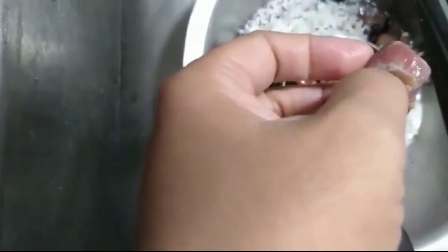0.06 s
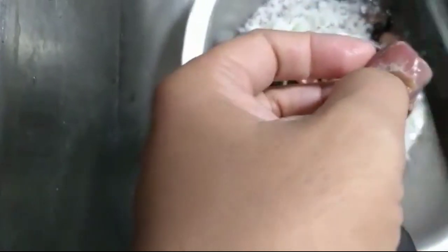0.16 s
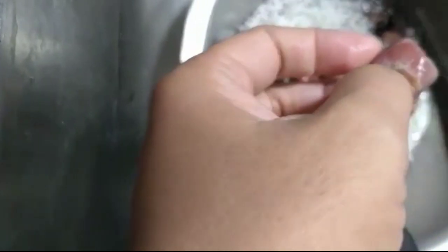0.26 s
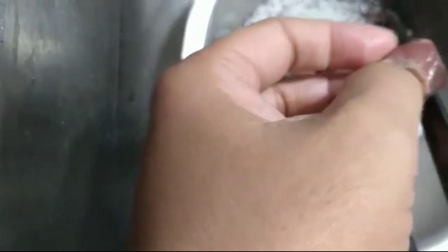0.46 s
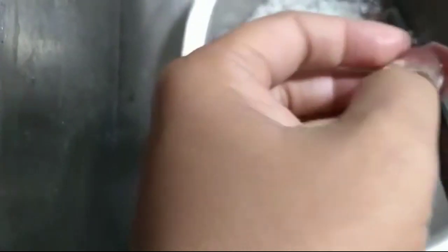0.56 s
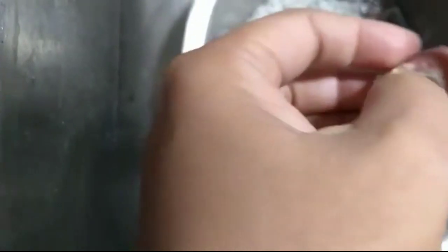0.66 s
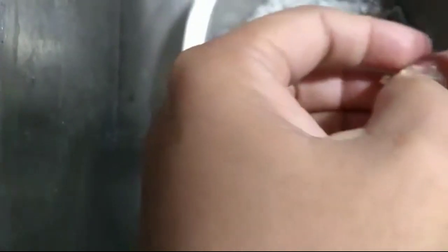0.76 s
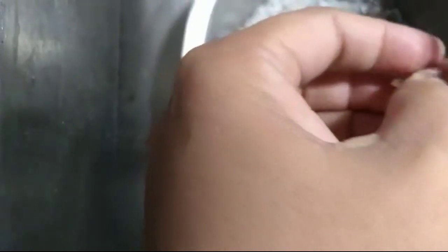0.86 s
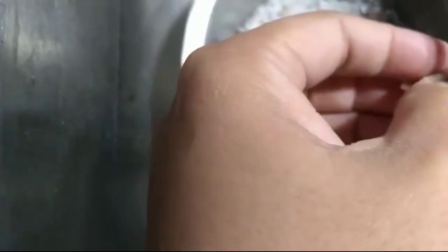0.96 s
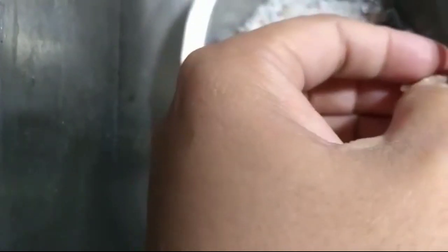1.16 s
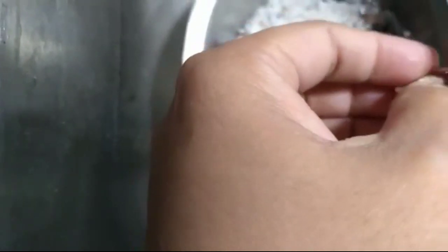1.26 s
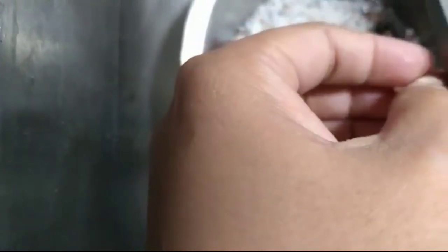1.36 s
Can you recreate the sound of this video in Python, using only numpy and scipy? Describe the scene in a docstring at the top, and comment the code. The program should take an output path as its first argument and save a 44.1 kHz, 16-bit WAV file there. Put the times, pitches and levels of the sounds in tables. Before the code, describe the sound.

Scissors snip soft meat once over a bowl in a steel sink, close to the microphone: hissy metal scrape into a sharp woody clack, short ring, soft fading knocks, then near silence with faint low handling rumble.

```python
"""One kitchen-scissors snip

Scissors cut through liver, close over a bowl in a steel sink. Random catches of edge on edge make a short
bright rasp; then the handles clap shut with dry cracks and a thump of low modes that rings in sink and room.
Wet grains and a thin ping follow, with soft swelling bumps after the clap and noisy rubs from just before
it onwards. Grip rumble, a low wavering hum of sines and a faint coloured-noise hiss lie underneath."""
import sys
import numpy as np
from scipy import signal
from scipy.fft import rfft, irfft
from scipy.io import wavfile
from scipy.ndimage import map_coordinates

SR = 44100
rng = np.random.default_rng(int(sys.argv[2]) if len(sys.argv) > 2 else 0)


def dump_mix(stems):
    """Bounce the given channels to the path in sys.argv[1] as a 16-bit WAV at rate SR."""
    frames = np.atleast_2d(stems).T  # one column per channel
    limited = np.clip(frames, -1, 1)  # hard clip at full scale
    pcm = np.round(limited * 32767).astype(np.int16)
    wavfile.write(sys.argv[1], SR, pcm)


N = 61739
TIME = np.arange(N) / SR

# In every table, left-right is how much louder the left side is [dB]; spectrum levels are relative.
# Room tone and hiss: (frequency [Hz], level per Hz [dB])
AIR_SPECTRUM = [(25, -11), (120, -1), (450, -6), (1000, -18.5), (2500, -22), (4500, -28.5), (7500, -28),
                (9800, -17), (12000, -33)]
# Partials of the hum: (frequency [Hz], level before the swell [dB])
HUM_PARTIALS = [(60, -72), (120, -63), (240, -70.5)]
# Slow swell of the hum: (time [s], gain [dB])
HUM_SWELL = [(.55, -8.5), (.76, 0.5), (.92, -5.5), (1.02, 2), (1.22, 8), (1.4, 1)]
# Rumble of the grip: (time [s], level [dB])
GRIP_LEVEL = [(0, -67), (.5, -66), (.6, -93), (.68, -62.5), (.88, -65.5), (1.03, -55.5), (1.11, -63),
              (1.25, -58), (1.4, -63)]
# Colour of the grip rumble: (frequency [Hz], level per Hz [dB])
RUMBLE_SPECTRUM = [(25, -17.5), (60, 5.5), (120, -1.5), (200, 3.5), (300, 0.5), (450, -21), (900, -28),
                   (2000, -36)]
# Reflections of sink and walls: (frequency [Hz], relative level [dB], T60 [s])
ROOM_BANDS = [(99.9, -16, .25), (299.6, -17.5, 0.11), (647, -4.5, 0.27), (1370, -5.5, 0.23),
              (2800, -12, 0.2), (5500, -7, 0.15), (9500, -9, 0.27), (12500, -25.5, .26)]
# The hand moves across: (time [s], left-right [dB])
HAND_PAN = [(.45, -7.5), (.66, 6), (1.25, 14)]
# The left side lags at first, then both sides nearly coincide: (time [s], lag of the left side [s])
LEFT_LAG = [(.5, .0005), (.66, 0.000023)]
# Faint rubs of meat, fingers and blades:
# (centre time [s], level [dB], Gaussian spread [s], centre [Hz], width [octaves], left-right [dB])
RUBS = [(0.278, -34, 0.0074, 279.8, 0.73, 5.5), (0.362, -62.5, 0.036, 6380, 0.38, 4),
        (0.475, -71.5, 0.05, 1876, 0.8, 3.5), (0.496, -67, 0.017, 2760, 0.032, 4),
        (0.914, -67, .01, 629.5, 0.084, 0.5), (1.015, -75.5, 0.03, 5350, 1.03, 7.5),
        (1.26, -74.5, 0.019, 1490, 1.02, 7.5)]
# Soft bumps of fingers and handles: (time [s], level [dB], pitch [Hz], T60 [s], build-up [s])
BUMPS = [(0.31, -19, 161, 0.06, 0.0017), (0.345, -26, 186, 0.018, 0.011), (.364, -36, 217, 0.06, 0.0078),
         (.392, -35.5, 198.7, 0.034, 0.021), (0.449, -39.5, 186.7, 0.038, 0.012),
         (0.667, -45.5, 161.5, 0.045, 0.0028), (0.684, -48.5, 276.6, 0.06, 0.007),
         (0.884, -55.5, 55, .15, 0.014), (1.007, -48.5, 73.7, 0.11, 0.01),
         (1.043, -45.5, 228, 0.041, 0.0032), (1.254, -42, 126.7, 0.066, 0.0054)]
# Colour of the wet grains: (frequency [Hz], level per Hz [dB])
SQUELCH_SPECTRUM = [(400, -2.5), (650, 5.5), (1100, -4), (2600, 0), (4300, -15.5), (11000, -22)]
# What the clap rings in handles, hand and sink:
# (frequency [Hz], relative level [dB], T60 [s], build-up [s], left-right [dB])
BODY_MODES = [(87.4, -15.5, 0.18, 0.012, -1.5), (128, -17, .12, .006, -3), (160.8, -15.5, .15, 0.014, 2.5),
              (206, -15.5, .17, .012, -6), (298, 1, .06, .001, -3), (379.3, -16, 0.071, 0.0011, -3.5),
              (515.8, -16, 0.13, .002, 0.5), (702, -19, 0.099, 0.0012, 0.5)]
# The handles meet, then fainter cracks follow, likely thrown back by the sink wall:
# (time [s], level [dB], left-right [dB])
CRACKS = [(0.282, -15, -5), (0.2856, -26, 6), (0.289, -26, 4)]
# Colour of the cracks: (frequency [Hz], level per Hz [dB])
CRACK_SPECTRUM = [(400, 0.5), (1500, 1), (2300, 3.5), (3200, 0.5), (4200, -10), (6000, -17.5),
                  (8000, -15.5), (9800, -3.5), (12500, -27)]
# Ring of the steel blades: (frequency [Hz], relative level [dB], T60 [s])
BLADE_MODES = [(8635, -8, .17), (9321, -7, .2), (9678, -8, .2), (11533, -8, .18)]
# Colour of the rasp: (frequency [Hz], level per Hz [dB])
RASP_SPECTRUM = [(1100, -38.5), (1600, -18), (2100, -15.5), (2550, -8.5), (2950, -15.5), (3350, -7),
                 (4250, -33.5), (4900, -9.5), (6000, -19.5), (7100, -8), (10000, 0), (12600, 2.5),
                 (13800, -28.5)]

# Underneath
ALIKE_HZ = 704   # below this both sides hear much the same
AIR_DB, AIR_PAN_DB = -67.5, 2.1
HUM_WAVER_PER_S, HUM_WAVER_TURNS = 28, 0.11   # random phase drift, in turns
GRIP_TREMBLE_PER_S, GRIP_TREMBLE_DB = 35, -0.5
LOW_PAN_SHARE = 0.17   # how far rumble and hum move with the hand
ROOM_DELAY_S, ROOM_BUILD_S = 0.0013, 0.0083
CUTOFF_HZ = 13100

# Hands, bowl and meat
RUB_GRAIN_PER_S, RUB_GRAIN_DB = 510, 2.5
PING_S, PING_DB, PING_RISE_S = 0.291, -22, 0.0092
PING_HZ, PING_T60_S, PING_PAN_DB = 905, 0.14, -3
SQUELCH_DB, SQUELCH_T60_S, SQUELCH_PER_S, SQUELCH_SPREAD_DB = -38, 0.2, 700, 9

# The handles meet
SHUT_S = 0.281
CONTACT_S = 0.00085   # a longer contact makes a duller thump
THUMP_DB, THUMP_LOW_HZ = -5.5, 50
CRACK_RISE_S, CRACK_T60_S, CRUNCH_PER_S = 0.001, 0.02, 4300
SNAP_HZ, SNAP_T60_S, SNAP_DB, SNAP_PAN_DB = 3003, 0.017, -18.5, -10.5
BLADES_DB = -42.5   # added to the relative levels of the blade modes

# The blades slide, then drag on faintly until they are shut
SHEAR_S, SHEAR_RISE_S, SHEAR_HOLD_S, SHEAR_T60_S = 0.2281, 0.0105, 0.008, 0.055
SHEAR_DB, DRAG_DB = -20.5, -17.5   # the drag is relative to the full slide
SHEAR_PAN_DB, SHEAR_TRAVEL_S = -12.5, 0.016   # the crossing point runs along the blades to the centre
CATCHES_PER_S, CATCH_SPREAD_DB = 9100, 1.5
RASP_TOP_HZ, RASP_TOP_SHADE_DB = 11500, -7.5   # the hand shades the highest treble on the left
GRIT_TOP_HZ, GRIT_LATE_S = 4300, 0.011   # the lower grit sets in as the blades bite
SHEAR_RING_DB = -14.5   # ring of the blades relative to the rasp


def from_db(db):
    """Decibels to gain."""
    return 10 ** (np.asarray(db) / 20)


def rms_one(x):
    """Scale to unit rms."""
    return x / np.sqrt(np.mean(x ** 2) + 1e-20)


def pan(db):
    """Left and right gains for a left-right difference in dB."""
    return from_db(np.array([[1], [-1]]) * db / 2)


def at_hz(points, hz, axis=1):
    """Read a column of a table on a log-frequency axis."""
    table = np.array(points)
    return np.interp(np.log(hz + 1), np.log(table[:, 0]), table[:, axis])


def in_time(points):
    """A control curve at every sample."""
    return np.interp(TIME, *np.transpose(points))


def onset(start, rise):
    """A straight rise from 0 to 1."""
    return np.clip((TIME - start) / rise, 0, 1)


def fade(start, t60):
    """Zero until the start, then an exponential decay from 1."""
    return (TIME >= start) * from_db(-60 * np.maximum(TIME - start, 0) / t60)


def ring(start, hz, t60):
    """A struck mode: a sine that decays exponentially."""
    return fade(start, t60) * np.sin(2 * np.pi * hz * (TIME - start))


def flutter(per_s):
    """Smooth chance with a spread of about 1, changing so many times a second."""
    return np.interp(TIME * per_s, np.arange(N), rng.standard_normal(N))


def colour(x, spectrum):
    """Give a steady signal a spectrum; rms 1."""
    gains = from_db(at_hz(spectrum, np.fft.rfftfreq(N, 1 / SR)))
    return rms_one(irfft(rfft(x) * gains, N))


def stereo_noise():
    """White noise, shared by both sides in the bass and unrelated in the treble."""
    mid, side = rfft(rng.standard_normal((2, N)))
    alike = 1 / (1 + (np.fft.rfftfreq(N, 1 / SR) / ALIKE_HZ) ** 2)
    shared = np.sqrt(1 + alike) * mid
    opposed = np.sqrt(1 - alike) * side * [[1], [-1]]
    return irfft(shared + opposed, N)


def catches(per_s, spread_db):
    """Tiny random clicks of uneven size and either sign, unrelated on the two sides."""
    sizes = from_db(spread_db * np.minimum(rng.exponential(1, (2, N)), 4))
    signs = rng.choice([-1, 1], (2, N))
    return sizes * signs * (rng.random((2, N)) < per_s / SR)


def room_tone():
    """Steady coloured noise: the air of the room and a hiss."""
    return from_db(AIR_DB) * pan(AIR_PAN_DB) * colour(stereo_noise(), AIR_SPECTRUM)


def hum():
    """Low sine partials whose phases drift separately, swelling together."""
    partials = 0
    for hz, db in HUM_PARTIALS:
        turns = hz * TIME + rng.random() + HUM_WAVER_TURNS * flutter(HUM_WAVER_PER_S)
        partials = partials + from_db(db) * np.sqrt(2) * np.sin(2 * np.pi * turns)
    return pan(LOW_PAN_SHARE * in_time(HAND_PAN)) * from_db(in_time(HUM_SWELL)) * partials


def grip_rumble():
    """Uneven low noise from the trembling grip."""
    level_db = in_time(GRIP_LEVEL) + GRIP_TREMBLE_DB * flutter(GRIP_TREMBLE_PER_S)
    rumble = from_db(level_db) * colour(stereo_noise(), RUMBLE_SPECTRUM)
    return pan(LOW_PAN_SHARE * in_time(HAND_PAN)) * rumble


def kitchen(x):
    """Dense reflections from sink and walls, dying away band by band."""
    white, hz = rfft(stereo_noise()), np.fft.rfftfreq(N, 1 / SR)
    edges = np.geomspace(50, 16000, 15)
    build = onset(ROOM_DELAY_S, ROOM_BUILD_S)
    response = 0
    for low, high in zip(edges, edges[1:]):
        centre = np.sqrt(low * high)
        tail = build * fade(0, at_hz(ROOM_BANDS, centre, axis=2))
        band = irfft(white * ((hz >= low) & (hz < high)), N)
        response = response + from_db(at_hz(ROOM_BANDS, centre)) * band * tail / np.linalg.norm(tail)
    response = response * (TIME >= ROOM_DELAY_S)
    return signal.fftconvolve([x.mean(axis=0)], response, axes=1)[:, :N]


def rubs():
    """Faint swells of friction: grainy band-passed noise."""
    out = 0
    for s, db, spread_s, hz, octaves, side_db in RUBS:
        edges = np.clip(hz * 2 ** (np.array([-0.5, 0.5]) * octaves), 20, SR / 2 - 20)
        band = signal.butter(1, edges, "band", fs=SR, output="sos")
        friction = signal.sosfilt(band, stereo_noise())
        grain = from_db(RUB_GRAIN_DB * flutter(RUB_GRAIN_PER_S))
        swell = np.exp(-0.5 * ((TIME - s) / spread_s) ** 2)
        out = out + from_db(db) * pan(side_db) * swell * rms_one(grain * friction)
    return out


def bumps():
    """Dull knocks of the hand on the handles: each swells as the flesh presses, then dies quickly."""
    knocks = 0
    for s, db, hz, t60, rise in BUMPS:
        press = np.where(TIME < s + rise, onset(s, rise), fade(s + rise, t60))
        knocks = knocks + from_db(db) * press * np.sin(2 * np.pi * hz * (TIME - s))
    return pan(in_time(HAND_PAN)) * knocks


def ping():
    """Something thin and hard, likely the bowl, gives one short, dry note just after the clap."""
    note = onset(PING_S, PING_RISE_S) * ring(PING_S, PING_HZ, PING_T60_S)
    return from_db(PING_DB) * pan(PING_PAN_DB) * note


def squelch():
    """The cut meat parts in uneven wet grains that die away."""
    grains = colour(catches(SQUELCH_PER_S, SQUELCH_SPREAD_DB), SQUELCH_SPECTRUM)
    return from_db(SQUELCH_DB) * fade(SHUT_S, SQUELCH_T60_S) * grains


def thump():
    """The blow of the handles, softened by the grip, rings the low modes."""
    modes = 0
    for hz, db, t60, rise, side_db in BODY_MODES:
        modes = modes + from_db(db) * pan(side_db) * ring(SHUT_S, hz, t60) * onset(SHUT_S, rise)
    push = TIME * np.exp(-2 * np.pi * TIME / CONTACT_S)   # a soft contact pulse
    softened = signal.fftconvolve(modes, [push / push.sum()], axes=1)[:, :N]
    blow = -from_db(THUMP_DB) * softened   # polarity flipped
    return signal.sosfilt(signal.butter(2, THUMP_LOW_HZ, "high", fs=SR, output="sos"), blow)


def blade_ring(start):
    """All modes of the steel blades, at slightly different random levels on each side."""
    modes = 0
    for hz, db, t60 in BLADE_MODES:
        modes = modes + from_db(db + rng.normal(0, 1, (2, 1))) * ring(start, hz, t60)
    return modes


def clap():
    """The handles meet in a dry, grainy crack with fainter ones after it, a brief hard snap and blade ring."""
    bursts = 0
    for s, db, side_db in CRACKS:
        bursts = bursts + from_db(db) * pan(side_db) * onset(s, CRACK_RISE_S) * fade(s, CRACK_T60_S)
    cracks = bursts * colour(catches(CRUNCH_PER_S, CATCH_SPREAD_DB), CRACK_SPECTRUM)
    snap = from_db(SNAP_DB) * pan(SNAP_PAN_DB) * ring(SHUT_S, SNAP_HZ, SNAP_T60_S)
    return cracks + snap + from_db(BLADES_DB) * blade_ring(SHUT_S)


def shear():
    """Edge catches on edge thousands of times a second as the blades close, and the steel rings along."""
    rise = onset(SHEAR_S, SHEAR_RISE_S) ** 2
    release_s = SHEAR_S + SHEAR_RISE_S + SHEAR_HOLD_S
    slide = np.where(TIME < release_s, rise, fade(release_s, SHEAR_T60_S))
    drag = from_db(DRAG_DB) * rise * (TIME < SHUT_S)

    left, right = catches(CATCHES_PER_S, CATCH_SPREAD_DB)
    shaded = [(hz, db + RASP_TOP_SHADE_DB * (hz > RASP_TOP_HZ)) for hz, db in RASP_SPECTRUM]
    texture = np.array([colour(left, shaded), colour(right, RASP_SPECTRUM)])
    rasp = from_db(SHEAR_DB) * np.maximum(slide, drag) * texture

    grit = signal.sosfiltfilt(signal.butter(2, GRIT_TOP_HZ, fs=SR, output="sos"), rasp)
    rasp = rasp - grit * (1 - onset(SHEAR_S, GRIT_LATE_S) ** 2)
    steel = signal.fftconvolve(rasp, blade_ring(0), axes=1)[:, :N]
    steel = rms_one(steel) * rasp.std()   # as strong as the rasp, before its own level
    side_db = SHEAR_PAN_DB * (1 - onset(SHEAR_S, SHEAR_TRAVEL_S) ** 2)
    return pan(side_db) * (rasp + from_db(SHEAR_RING_DB) * steel)


def scene():
    """The snip and the hands with their reflections, plus the ping and the background without any."""
    left, right = rubs() + bumps() + squelch() + thump() + clap() + shear()
    lagged_left = map_coordinates(left, [(TIME - in_time(LEFT_LAG)) * SR], order=5)
    close = np.array([lagged_left, right])
    background = room_tone() + hum() + grip_rumble()
    return background + kitchen(close) + ping() + close


def record(dry):
    """A steep low-pass cuts the top."""
    return signal.sosfilt(signal.ellip(10, 0.3, 60, CUTOFF_HZ, fs=SR, output="sos"), dry)


dry = scene()
out = record(dry)
dump_mix(out)
```